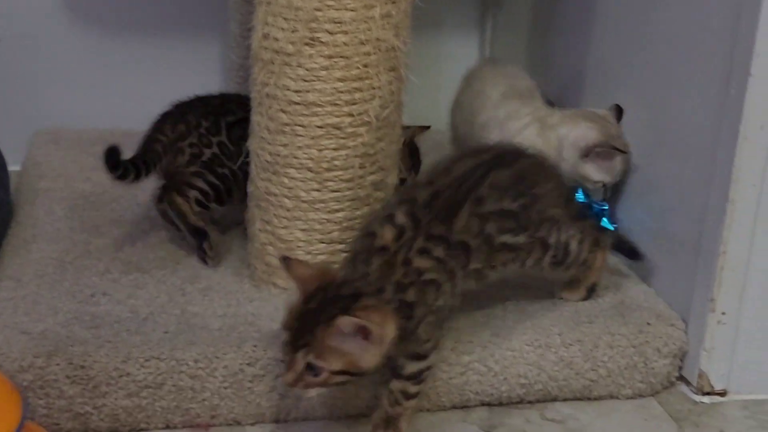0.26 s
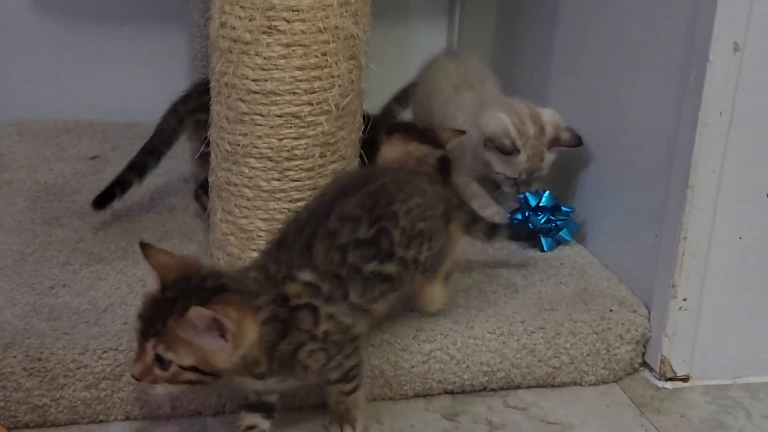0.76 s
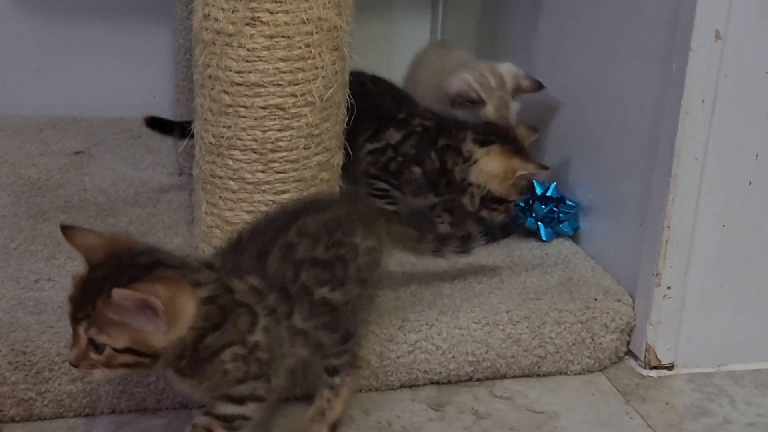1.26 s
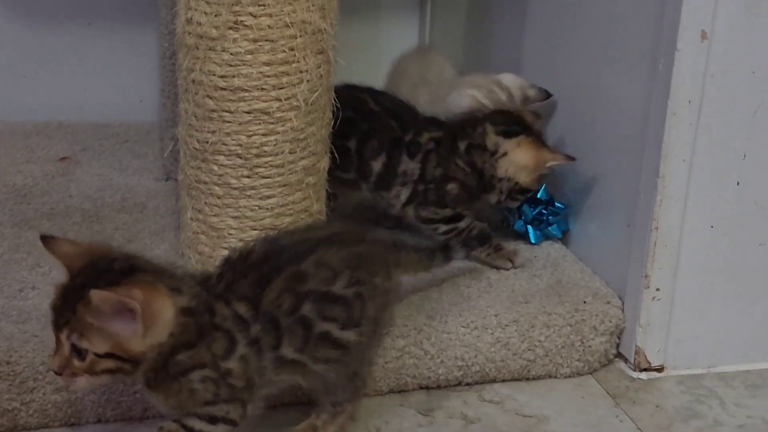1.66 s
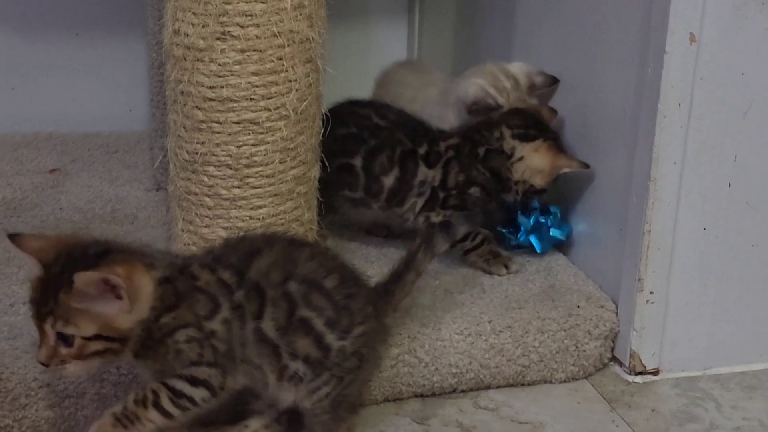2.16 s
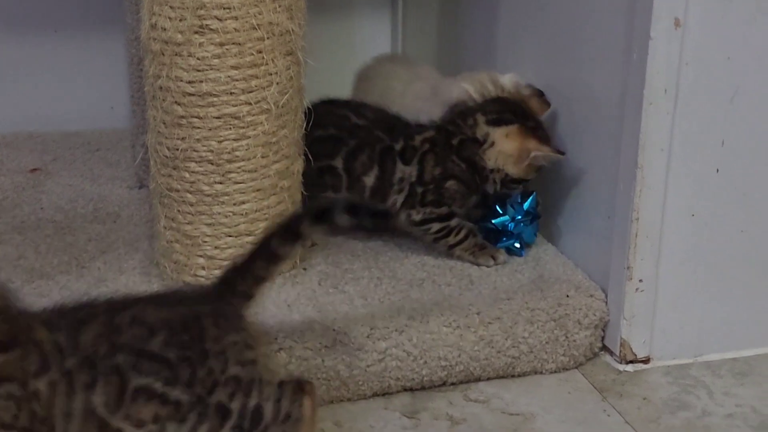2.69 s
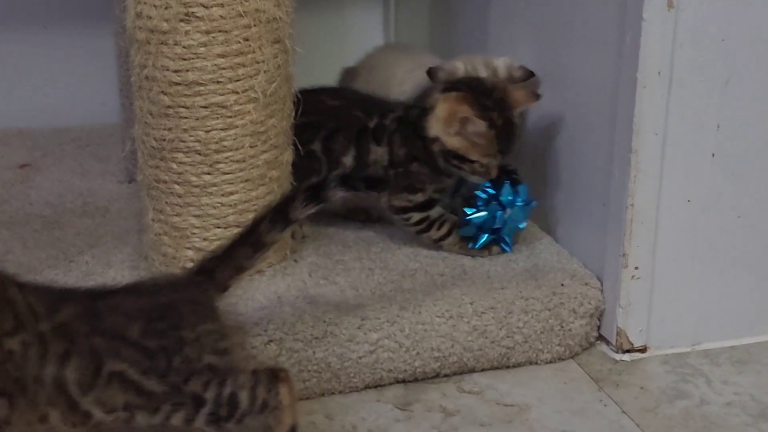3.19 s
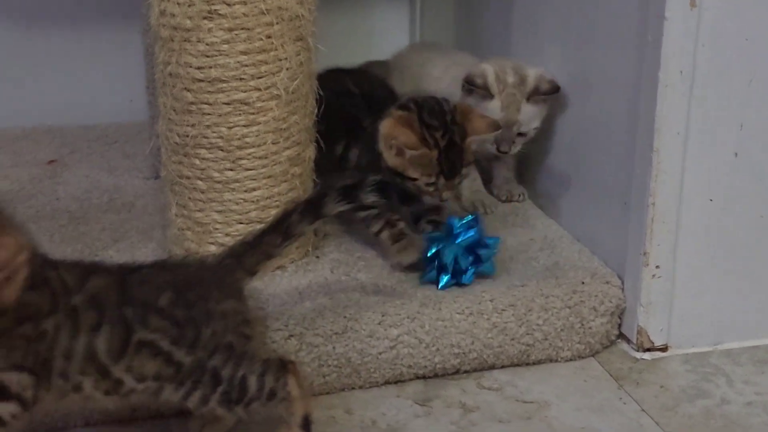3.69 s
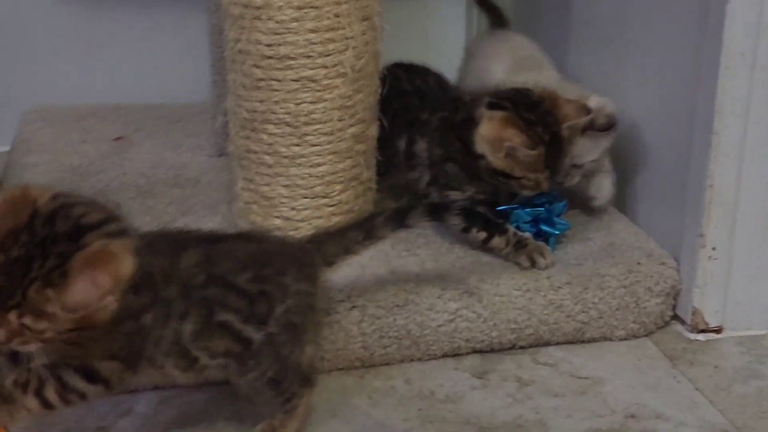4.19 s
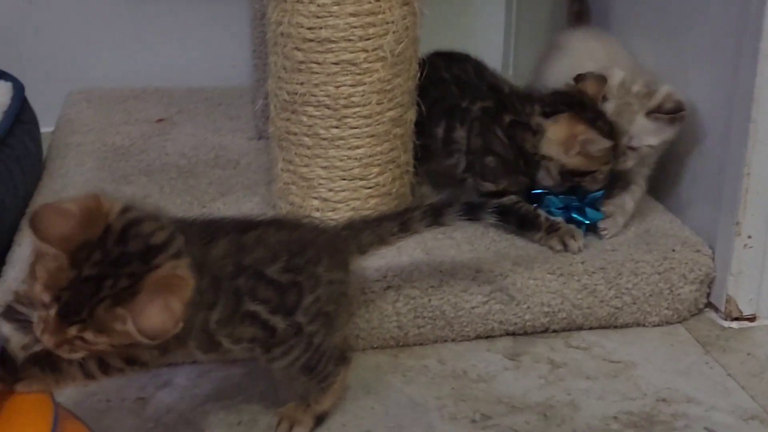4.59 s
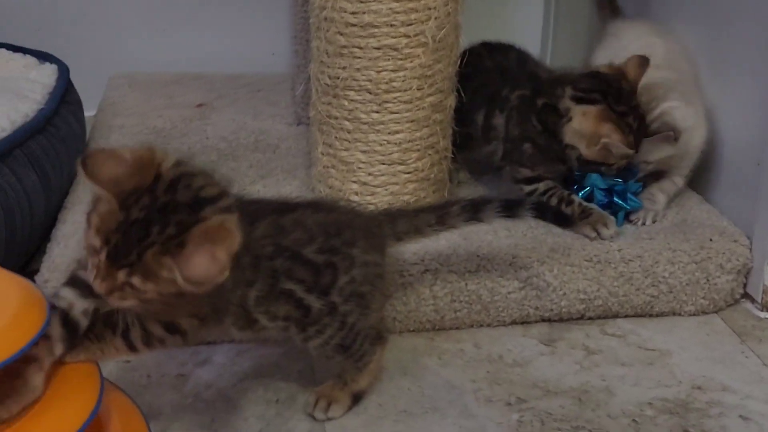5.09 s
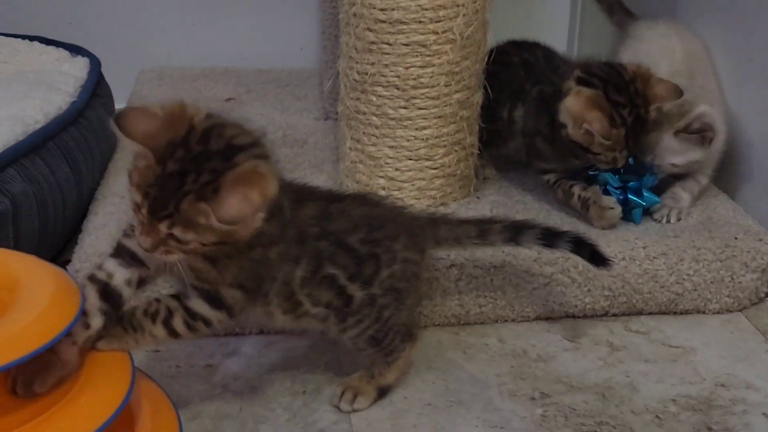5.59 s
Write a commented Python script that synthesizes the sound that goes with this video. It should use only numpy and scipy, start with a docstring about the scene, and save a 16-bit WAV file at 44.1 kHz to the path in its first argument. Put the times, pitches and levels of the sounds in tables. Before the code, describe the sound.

Throughout, a low, slowly beating hum from two motors, around 55 to 120 Hz, sits with room rumble and faint hiss in a small hard-floored room. From 0 to 0.9 s there is only faint fur brushing and tiny crinkles on a foil bow. At 0.94 s a small foil snap comes with a soft footfall; around 1.7 s a claw plucks carpet fibres in quick, dry rasps. Crinkles build from 2.1 s, with dull paw thuds. At 2.55 s hollow plastic knocks begin; the loudest foil snap cracks at 2.8 s. A hard knock at 3.0 s sets a ball rolling and rattling, with rim ticks and scrapes, slowing until about 4.2 s. Bright foil bursts come at 3.64, 3.73 and 3.82 s, another snap at 4.31 s. Weaker rolls follow at 4.26 and 4.97 s, then sparse soft knocks, fine crackles and brushing until nearly 6 s.

```python
"""Throughout, two motors hum through a small hard-floored room over low noise and faint hiss.
First, kittens' paws and bites crinkle a foil bow: swarms of clicks, one for each flipping crease.
A foil loop snaps at 0.94 s, and more snap from 2.6 s, as bursts that ring; at 1.7 s a claw plucks carpet
fibres in short rasps. From 2.6 s a nearer kitten bats a ball in a plastic track: struck resonances make the
knocks, and grains make the roll, which slows after each push, and the rubs on the rim. Soft footfalls, from
0.94 s on, are damped low swings."""
import sys
import numpy as np
from scipy import signal
from scipy.fft import rfft, irfft
from scipy.io import wavfile

SR = 44100
rng = np.random.default_rng(int(sys.argv[2]) if len(sys.argv) > 2 else 0)


def put_to_file(sound):
    """Save the sound as 16-bit audio at rate SR, in the file named by the first command-line argument."""
    columns = np.atleast_2d(sound).T  # one column per channel
    safe = np.clip(columns, -1, 1)
    whole_steps = np.round(safe * 32767)
    wavfile.write(sys.argv[1], SR, whole_steps.astype(np.int16))


N = 257984  # samples in the scene
TAPS = 2048  # samples in a short sound
EDGE_HZ = 16550  # upper band limit

# Levels of events are in dB before the trim_db of their function; colours are relative.
# Partials of the motors. Each row: frequency in Hz, rms level in dB before the waver.
HUM_PARTIALS = [(54.36, -69), (59.23, -60.5), (108.72, -57), (118.48, -61.5), (163.08, -73), (251.4, -80)]
# Colour of the low room noise. Each row: frequency in Hz, level in dB.
BOOM_COLOUR = [(20, -14.5), (40, 1.5), (58, -9.5), (90, 5), (115, 3), (140, -8), (200, -16.5), (245, -15.5),
               (290, -24), (400, -30), (700, -72.5)]
# Colour of the steady hiss. Each row: frequency in Hz, level in dB.
HISS_COLOUR = [(180, -31.5), (300, -8.5), (420, -8), (700, -8.5), (1000, -15), (1600, -17.5), (2800, -22),
               (4400, -21.5), (5500, -27.5), (7000, -27), (8300, -24.5), (9000, -28.5), (9600, -40.5),
               (16000, -35)]
# Likeness of the two sides in diffuse sound. Each row: frequency in Hz, correlation from -1 to 1.
SIDE_CORRELATION = [(25, -0.37), (60, 1), (130, 0.89), (290, 0.54), (600, 0.23), (1000, 0.1),
                    (1600, -0.083), (3000, 0.039), (15000, -0.13)]
# Decay of the room. Each row: frequency in Hz, t60 in seconds.
ROOM_DECAY = [(150, 0.51), (500, 0.31), (1500, 0.56), (4000, 0.4), (8000, 0.29), (15000, 0.23)]
# Paws land on the carpeted stand and the floor. Each row: start in seconds, level in dB, pitch in Hz.
FOOTFALLS = [(0.936, -43, 106.6), (2.224, -38.5, 81.3), (2.332, -39, 62.6), (2.565, -34.5, 83.3),
             (3.018, -38, 79), (3.867, -39, 81.4), (4.497, -38.5, 108.3)]
# Paws shuffle on the hollow carpeted stand. Each row: start in seconds, length in seconds, level in dB,
# resonance in Hz.
STAND_SHUFFLES = [(2.999, 0.052, -58, 365), (3.736, .12, -61.5, 256), (3.848, 0.096, -67, 208),
                  (4.033, .05, -73, 387), (4.305, .035, -63.5, 266), (4.506, 0.043, -66, 205),
                  (4.707, 0.039, -69.5, 334)]
# Carpet fibres let go of a claw. Each row: start in seconds, level in dB, pitch in Hz.
FIBRE_PLUCKS = [(1.659, -73, 4470), (1.666, -70, 2880), (1.675, -69, 2600), (1.694, -65, 5000),
                (1.702, -67, 2700), (1.709, -63, 3740), (1.713, -63.5, 5500), (1.722, -66.5, 3700),
                (1.733, -71, 4500), (1.74, -67.5, 3450)]
# Colour of a plucked fibre. Each row: frequency in Hz, level in dB.
FIBRE_COLOUR = [(500, -21), (1700, -12), (2065, 2), (2350, -8), (3600, 1.5), (5900, 1), (6500, -7),
                (7350, 4), (9000, -9), (10000, -22), (16000, -19)]
# Fur brushes the bow. Each row: start in seconds, length in seconds, level in dB at the crest.
FUR_STROKES = [(0.0, 0.92, -88), (3.28, 0.29, -88.5), (4.595, 0.11, -83), (4.676, 0.24, -82.5),
               (5.04, 0.36, -89.5), (5.358, 0.2, -83), (5.574, 0.5, -81)]
# A paw sets the ball rolling. Each row: start in seconds, time to a stop in seconds, level in dB at the start.
BALL_ROLLS = [(3.057, 1.18, -65.5), (4.262, 0.76, -79), (4.972, 1.5, -81)]
# Colour of the rolling rumble. Each row: frequency in Hz, level in dB.
RUMBLE_COLOUR = [(100, -7), (220, 4), (350, -10.5), (450, -10.5), (600, 5), (780, -7), (1000, -7.5),
                 (1500, -35)]
# Colour of the rattle and of contacts with the rim. Each row: frequency in Hz, level in dB.
RATTLE_COLOUR = [(600, -46), (950, 3.5), (1400, 7), (1900, 0), (2300, -11), (3000, -28), (6000, -31.5),
                 (12000, -60)]
# Spots of the track under the ball. Each row: frequency in Hz, level in dB, t60 in seconds.
ROLLED_SPOTS = [(480, -4, 0.033), (590, -5, 0.043), (770, -4, 0.05), (975, -7, 0.039), (1354, -11.5, 0.031),
                (1585, -7.5, 0.053), (1750, -8, 0.027)]
# The ball rubs along the rim. Each row: start in seconds, length in seconds, level in dB, rim resonance in Hz.
RIM_SCRAPES = [(2.562, 0.044, -55, 1820), (2.753, 0.053, -61, 1640), (3.006, 0.05, -49, 1240),
               (3.016, 0.038, -49, 2170), (3.192, 0.021, -61.5, 1870), (3.248, 0.097, -66, 1040),
               (3.404, 0.05, -64, 1600), (3.59, 0.041, -61.5, 1580), (3.678, .03, -60.5, 1340),
               (3.799, 0.097, -67, 1230), (3.905, 0.049, -72, 865), (3.944, 0.081, -63.5, 1440),
               (3.948, 0.078, -62, 855), (4.072, 0.09, -68, 1300), (4.112, 0.038, -71, 2060),
               (4.355, .06, -73, 703), (4.441, .035, -76, 870), (4.529, 0.039, -70.5, 950),
               (4.599, .09, -82, 960), (5.067, 0.1, -77, 596), (5.17, 0.047, -77, 566),
               (5.386, 0.048, -79.5, 1260)]
# The ball clips the rim. Each row: start in seconds, level in dB, rim resonance in Hz.
RIM_BUMPS = [(3.199, -50.5, 1520), (3.264, -49, 900), (3.399, -47, 1800), (3.413, -47, 1700),
             (3.437, -51, 1560), (3.493, -57, 1840), (3.603, -55, 1590), (3.688, -56, 1400),
             (3.875, -57, 958), (3.914, -52.5, 1100), (3.955, -56, 851), (4.072, -56, 1570),
             (4.124, -55, 1790)]
# The ball or a paw knocks the track. Each row: start in seconds, level in dB, hardness in dB (0 is bare
# plastic, -25 a soft paw), pitch of the struck spot in Hz, level of its tock in dB.
TRACK_KNOCKS = [(2.554, -55, 9, 560, -9), (2.572, -42, -12, 508, -13), (2.594, -47, -3.5, 543, -6),
                (2.755, -54.5, -3, 550, -19), (2.778, -60.5, -12, 520, -11), (2.833, -62, 1, 534, -3.5),
                (3.001, -37, 4, 530, -8), (3.005, -42.5, -5, 480, -11.5), (3.013, -44.5, -12, 452, -6),
                (3.022, -47, -4, 660, -29), (3.402, -59, -20, 610, -9.5), (3.598, -58, -18, 558, -10),
                (3.645, -60, -23, 570, -10), (3.689, -58, -16, 770, -14), (3.712, -60, -18, 770, -11),
                (3.736, -59, -18, 630, -14), (4.039, -59, -23.5, 535, -13), (4.08, -58.5, -20, 564, -8.5),
                (4.124, -61.5, -14, 556, -5), (4.18, -69.5, -27, 623, -5), (4.274, -61, -23.5, 622, -6),
                (4.499, -66.5, -21, 826, -10.5), (4.656, -68, -22, 633, -10), (4.716, -65, -19, 557, -7),
                (4.988, -71, -7, 800, -6.5), (5.388, -69, -11, 590, -10), (5.74, -59, -22, 560, -7)]
# Modes of the whole track. Each row: frequency in Hz, level in dB, t60 in seconds.
RING_MODES = [(268.8, -4.5, 0.35), (420, 9.5, 0.075), (478, 0.5, 0.16), (586, 10.5, 0.029),
              (710, -16.5, 0.027), (978, -7.5, 0.28), (1350, -18, 0.21), (1640, -20, 0.22),
              (1760, -14.5, 0.11), (2060, -14, 0.061), (2145, -7.5, 0.11)]
# Colour of a contact on the plastic. Each row: frequency in Hz, level in dB.
PLASTIC_COLOUR = [(60, -33.5), (220, -2), (330, -8.5), (500, 0.5), (700, 6.5), (1000, -0.5), (1400, 9.5),
                  (2000, 6), (2600, 1.5), (4500, -0.5), (8000, -20.5), (10000, -17), (12500, -9),
                  (16000, -19)]
# A paw or a bite crushes the bow. Each row: start in seconds, level in dB, loop pitch in Hz,
# swell time in seconds, body in dB, fizz in dB before loop size and force.
BOW_CRUSHES = [(0.115, -63, 7350, 0.0093, -4, -23), (0.479, -68, 7600, 0.0034, -1, -16),
               (0.644, -68.5, 7100, 0.0076, 4, -15), (0.929, -59.5, 7250, 0.014, -2, -17),
               (2.111, -63, 8250, 0.0052, -2, -20), (2.213, -56.5, 7800, 0.0029, 4, -19),
               (2.232, -50, 7400, 0.0056, -0.5, -20), (2.288, -52.5, 7400, 0.012, -5.5, -23),
               (2.395, -51, 7400, 0.012, -3, -18), (2.552, -45.5, 4900, 0.0055, 5, -16),
               (2.574, -42, 6600, 0.008, -0.5, -15), (2.659, -59.5, 7400, 0.021, -1, -11),
               (2.75, -57, 4570, 0.035, -1.5, -14), (2.965, -45, 5700, 0.0093, 0, -15),
               (2.986, -39.5, 5930, 0.0094, -3, -14), (3.133, -51.5, 6500, 0.0064, 4, -17.5),
               (3.563, -61.5, 7730, 0.0071, -1.5, -20), (3.676, -55.5, 6960, 0.063, -3.5, -15),
               (3.729, -42.5, 4600, 0.0072, 0.5, -18), (3.821, -46.5, 7500, 0.0029, -3.5, -18),
               (3.994, -58.5, 5600, 0.017, -0.5, -14), (4.334, -62.5, 6400, 0.024, 3.5, -15),
               (4.415, -64, 6200, 0.014, -3, -16.5), (4.999, -59.5, 4400, 0.0068, -2.5, -13),
               (5.588, -61.5, 9200, 0.0026, -2, -19.5), (5.632, -68.5, 7660, 0.0037, -5, -18),
               (5.735, -63.5, 4970, 0.012, -2, -14), (5.822, -73, 7400, .012, -3, -21)]
# A foil loop buckles at once. Each row: start in seconds, level in dB, loop pitch in Hz, body in dB,
# lowest ring of the bow in Hz, fizz in dB before loop size and force.
LOOP_SNAPS = [(0.9443, -44.5, 6600, -9, 503, -18), (2.59, -31.5, 5900, -1.5, 550, -16),
              (2.805, -21.5, 5880, -9, 1300, -21), (2.8074, -23.5, 6370, -5.5, 1410, -14.5),
              (2.8134, -33, 9050, -1, 1690, -12.5), (2.818, -39, 9000, 3, 1690, -18),
              (2.827, -46.5, 6000, 16, 1540, -20), (3.0001, -31.5, 5760, 6.5, 1510, -9.5),
              (3.0985, -38.5, 5750, -20, 1500, -18), (3.6431, -36, 6970, -5, 1390, -11.5),
              (3.7303, -27.5, 4330, -4.5, 740, -14), (3.7316, -35.5, 6700, -14, 1500, -22),
              (3.76, -42, 6900, -11, 1500, -24), (3.8209, -43, 7750, -2, 1500, -20),
              (3.8423, -48.5, 7100, -8, 1485, -15), (4.045, -57, 7400, -4, 2000, -8),
              (4.1135, -58, 8700, -7, 2000, -14), (4.3132, -37, 5830, -3, 1210, -26),
              (4.3722, -57, 2800, 2.5, 1930, -18), (4.9929, -47.5, 4540, -9, 845, -12),
              (5.7049, -61, 4940, 6, 1800, -22), (5.7359, -64, 7260, 5, 1300, -23),
              (5.7471, -58, 4800, 0, 1400, -20), (5.8394, -60, 5450, -6.5, 1980, -18)]
# Colour of the foil. Each row: frequency in Hz, level in dB.
FOIL_COLOUR = [(100, -34), (500, 3.5), (1100, -4.5), (1700, -4), (2400, -4.5), (4000, -0.5), (5600, -4),
               (6600, -6.5), (8600, 0), (10200, 3.5), (12500, 11), (16000, 0.5)]
# Colour of a buckling loop, on top of the foil's. Each row: frequency in Hz, level in dB.
BUCKLE_COLOUR = [(1400, -2), (2600, 0), (4000, -2.5), (5000, 3), (5800, 0), (7200, 1), (9000, -4),
                 (12500, -2)]


def gain_of(db):
    """Decibels to gain."""
    return 10 ** (np.asarray(db) / 20)


def unit(x):
    """Scales to an energy of one."""
    return x / np.sqrt(np.sum(x ** 2) + 1e-20)


def evened(x):
    """Scales to an rms of one."""
    return x / np.sqrt(np.mean(x ** 2) + 1e-20)


def read(points, hz):
    """Reads a table on a logarithmic frequency axis."""
    f, value = np.transpose(points)
    return np.interp(np.log(hz + 1), np.log(f + 1), value)


def add(mix, start_s, sound):
    """Mixes a sound in at start_s."""
    part = mix[max(round(start_s * SR), 0):][:len(sound)]
    part += sound[:len(part)]


def through(x, response):
    """Convolves and keeps the length."""
    return signal.fftconvolve(x, response)[:len(x)]


def filtered(x, edge_hz, kind):
    """Second-order Butterworth filter."""
    return signal.lfilter(*signal.butter(2, edge_hz, kind, fs=SR), x)


def colour(*spectra):
    """The minimum-phase click whose spectrum is the sum of the given dB tables."""
    hz = abs(np.fft.fftfreq(TAPS, 1 / SR))
    log_gain = np.log(gain_of(sum(read(points, hz) for points in spectra)))
    spectrum = np.exp(np.conj(signal.hilbert(log_gain)))
    return np.fft.ifft(spectrum).real[:TAPS // 2]


def grains(size, per_s, spread_db):
    """Clicks at random moments, of random sign and exponentially spread dB heights, at an rms of one."""
    chance, sign, big = rng.random((3, size))
    height = gain_of(spread_db * np.minimum(-np.log(1 - big), np.pi))
    return evened((chance < per_s / SR) * np.sign(sign - .5) * height)


def arch(size):
    """Root of a half sine: swells and fades."""
    return np.sqrt(np.sin(np.pi * np.arange(size) / size))


def drift(count):
    """Straight lines between count random points over the whole scene."""
    return np.interp(np.arange(N), np.linspace(0, N, count), rng.standard_normal(count))


def ping(hz, t60_s):
    """One dying resonance of unit energy."""
    t = np.arange(SR // 4) / SR
    return unit(np.sin(2 * np.pi * hz * t) * gain_of(-60 * t / t60_s))


def diffuse(pair):
    """Sound from all around: the sides share each band as far as their correlation says."""
    a, b = rfft(pair)
    same = read(SIDE_CORRELATION, np.fft.rfftfreq(pair.shape[1], 1 / SR))
    return irfft(np.array([a, same * a + np.sqrt(1 - same ** 2) * b]), pair.shape[1])


def room(x, wet_db, side_db, lag_s, near, near_s):
    """Direct sound is louder and earlier on the left; dense echoes start strongly and die band by band."""
    size = SR * 3 // 4
    echoes = diffuse(np.array([grains(size, per_s=5000, spread_db=-2.5) for side in range(2)]))
    hz, t, bands = signal.stft(echoes, SR, nperseg=256)
    decay = gain_of(-60 * t / read(ROOM_DECAY, hz)[:, None])
    tails = signal.istft(bands * decay, SR, nperseg=256)[1]
    age_s = np.arange(tails.shape[1]) / SR
    onset = 1 - np.exp(-age_s / 0.00046)
    near_walls = 1 + near * np.exp(-age_s / near_s)
    left, right = (gain_of(wet_db) * unit(tail) for tail in tails * onset * near_walls)
    left[0] += gain_of(side_db)
    right[round(lag_s * SR)] += gain_of(-side_db)
    return np.array([through(x, left), through(x, right)])


def air(spectrum, db):
    """Steady room noise: diffuse white noise shaped by a colour."""
    noise = rfft(diffuse(rng.standard_normal((2, N))))
    shape = gain_of(read(spectrum, np.fft.rfftfreq(N, 1 / SR)))
    return gain_of(db) * evened(irfft(noise * shape, N))


def hum(waver=0.46, wander_rad=0.13):
    """Two motors at slightly different speeds beat; each partial wavers in level and phase."""
    t = np.arange(N) / SR
    out = np.zeros(N)
    for hz, rms_db in HUM_PARTIALS:
        phase = 2 * np.pi * (hz * t + rng.random()) + wander_rad * drift(count=24)
        level = np.sqrt(2) * gain_of(rms_db) * (1 + waver * drift(count=24))
        out += level * np.sin(phase)
    return out


def thumps(trim_db=-3, swell_s=0.011):
    """Each footfall is a few damped low swings."""
    out, t = np.zeros(N), np.arange(SR // 4) / SR
    u = t / swell_s
    for s, db, hz in FOOTFALLS:
        add(out, s, gain_of(db + trim_db) * u * np.exp(1 - u) * np.sin(2 * np.pi * hz * t))
    return out


def shuffles(trim_db=-2, ring_t60_s=0.028):
    """Paws drag through the pile and the board beneath answers with a dull murmur."""
    out = np.zeros(N)
    for s, length_s, db, hz in STAND_SHUFFLES:
        size = round(length_s * SR)
        drag = np.pad(grains(size, per_s=810, spread_db=3.5) * arch(size), (0, TAPS))
        board = through(through(drag, ping(hz, ring_t60_s)), ping(hz, ring_t60_s / 4))
        add(out, s, gain_of(db + trim_db) * np.sqrt(size) * unit(board))
    return out


def plucks(trim_db=22, tear_s=0.0041, peak_db=7):
    """Each fibre tears free of the claw in a short rasp."""
    out, t = np.zeros(N), np.arange(TAPS) / SR
    for s, db, hz in FIBRE_PLUCKS:
        rasp = grains(TAPS, per_s=3700, spread_db=-1.5) * np.exp(-t / tear_s)
        click = colour(FIBRE_COLOUR, [(hz / 1.7, 0), (hz, peak_db), (hz * 1.3, 0)])
        add(out, s, gain_of(db + trim_db) * unit(through(rasp, click)))
    return out


def rolling(spots_db=-1, wobble_db=2.5, rattle_db=-2.5, rumble_power=0.59, rattle_power=0.79):
    """The ball runs over tiny bumps, excites spots of the track at random and slows evenly after each push."""
    rumble, rattle, out = np.zeros((3, N))
    for s, length_s, db in BALL_ROLLS:
        speed = np.linspace(1, 0, round(length_s * SR), endpoint=False)
        add(rumble, s, gain_of(db) * speed ** rumble_power)
        add(rattle, s, gain_of(db + rattle_db) * speed ** rattle_power)
    pressure = gain_of(wobble_db * drift(count=220))
    for spectrum, level in (RUMBLE_COLOUR, rumble), (RATTLE_COLOUR, rattle):
        surface = grains(N, per_s=190, spread_db=8.0) * pressure
        out += evened(through(surface, colour(spectrum))) * level
    spots = np.zeros(N)
    for hz, db, t60_s in ROLLED_SPOTS:
        presence = gain_of(7.0 * np.tanh(drift(count=70)))  # each spot comes and goes on its own
        taps = grains(N, per_s=90, spread_db=3.0) * presence
        spots += gain_of(db) * through(taps, ping(hz, t60_s))
    return out + gain_of(spots_db) * evened(spots) * rumble


def scrapes(trim_db=-3, ring_t60_s=0.021):
    """The ball sticks and slips on the rim: scratchy grains swell and fade, each rub with its resonance."""
    out = np.zeros(N)
    for s, length_s, db, hz in RIM_SCRAPES:
        size = round(length_s * SR)
        slips = np.pad(grains(size, per_s=450, spread_db=-0.5) * arch(size), (0, TAPS))
        scratch = unit(through(slips, colour(RATTLE_COLOUR)))
        ring = unit(through(slips, ping(hz, ring_t60_s)))
        add(out, s, gain_of(db + trim_db) * np.sqrt(size) * unit(scratch + ring))
    return out


def bumps(trim_db=17, ring_t60_s=0.02, skid_s=0.0018, top_hz=3000):
    """Each touch is a short skid that rings the rim at that place."""
    out, t = np.zeros(N), np.arange(TAPS) / SR
    for s, db, hz in RIM_BUMPS:
        skid = grains(TAPS, per_s=4000, spread_db=2.5) * np.exp(-t / skid_s)
        tick = unit(through(skid, colour(RATTLE_COLOUR))) + ping(hz, ring_t60_s)[:TAPS]
        add(out, s, gain_of(db + trim_db) * unit(tick))
    return filtered(out, top_hz, "low")


def track_ring():
    """The decaying modes of the plastic track after one tap."""
    t = np.arange(SR // 3) / SR
    return unit(sum(gain_of(db - 60 * t / t60_s) * np.sin(2 * np.pi * hz * t) for hz, db, t60_s in RING_MODES))


def knocks(trim_db=31, ring_db=-12, damping_db=-8, softest_db=-32, clack_per_hardness=0.51,
           tock_s=0.0064, chatter_s=0.0028, press_s=0.0021, split_hz=1800):
    """A push and gritty chatter set spot and track ringing; a soft pad presses in gradually and damps the ring."""
    out, ring = np.zeros(N), track_ring()
    t = np.arange(len(ring)) / SR
    for s, db, hard_db, hz, tock_db in TRACK_KNOCKS:
        soft = np.clip(hard_db / softest_db, 0, 1)
        rise = 1 - soft * np.exp(-t / press_s)
        pad = unit(rng.choice([-1, 1], len(t)) * t * np.exp(-t / press_s))
        push = np.sqrt(1 - soft ** 2) * (t == 0) + soft * pad
        chatter = unit(grains(len(t), per_s=4000, spread_db=6) * np.exp(-t / chatter_s))
        contact = filtered(push, split_hz, "low") + filtered(chatter, split_hz, "high")
        tock = unit(np.sin(2 * np.pi * hz * t + np.pi / 3) * rise * np.exp(-t / tock_s))
        blow = contact + gain_of(tock_db) * tock + gain_of(ring_db + damping_db * soft) * ring
        clack_db = clack_per_hardness * hard_db
        hardness = [(800, 0), (1300, clack_db), (2100, clack_db), (3400, hard_db)]  # soft knocks are dull
        add(out, s, gain_of(db + trim_db) * through(blow, colour(PLASTIC_COLOUR, hardness)))
    return out


def foil_click(body_db, fizz_db, hz, peak_db=6, spread=1.55):
    """One crease flipping: large facets give body, small ones fizz, and the loop adds a broad peak."""
    loop = [(hz / spread, 0), (hz, peak_db), (hz * spread, 0)]
    facets = [(3600, body_db), (5600, 0.0098), (8600, 0.0023), (10200, fizz_db)]
    return colour(FOIL_COLOUR, facets, loop)


def loop_click(db, hz, body_db, fizz_db, middle_hz=6000, firm_db=-48.5, fizz_db_per_octave=11, fizz_per_force=0.26):
    """The click of one loop: the smaller the loop and the harder it is pressed, the more fizz."""
    size_db = fizz_db_per_octave * np.log2(hz / middle_hz)
    force_db = fizz_per_force * (db - firm_db)
    return foil_click(body_db, fizz_db + size_db + force_db, hz, peak_db=5.5)


def brushing():
    """Faint, fine crackle of fur sliding over the foil; each stroke swells and fades."""
    click = foil_click(body_db=-1.5, fizz_db=-20.0, hz=7400)
    crackle = through(grains(N, per_s=3200, spread_db=7), click)
    pressure = np.zeros(N)
    for s, length_s, db in FUR_STROKES:
        add(pressure, s, gain_of(db) * arch(round(length_s * SR)))
    return evened(crackle) * pressure


def crinkles(trim_db=-4.0, spread_db=5, per_s=1100):
    """Each crush is a swarm of flipping creases that creeps in, peaks and dies away."""
    lead = SR // 10  # samples before the start
    out, t = np.zeros(N), np.arange(-lead, lead) / SR
    for s, db, hz, swell_s, body_db, fizz_db in BOW_CRUSHES:
        pressure = 1 / np.cosh(t / swell_s - 1)
        swarm = grains(len(t), per_s, spread_db) * pressure
        click = loop_click(db, hz, body_db, fizz_db)
        add(out, s + t[0], gain_of(db + trim_db) * through(swarm, click))
    return out


def snaps(trim_db=17, shiver_s=0.0011, ring_db=-15, ring_t60_s=0.0061, below_db=-17, edge_db=5):
    """A loop pops over, rings and shivers for milliseconds; the bow gives little below its lowest ring."""
    out, t = np.zeros(N), np.arange(TAPS) / SR
    for s, db, hz, body_db, low_hz, fizz_db in LOOP_SNAPS:
        shiver = unit(rng.choice([-1, 1], TAPS) * np.exp(-t / shiver_s))
        pop = shiver + gain_of(ring_db) * ping(hz, ring_t60_s)[:TAPS]
        click = loop_click(db, hz, body_db, fizz_db)
        bow = colour(BUCKLE_COLOUR, [(low_hz / 1.2, below_db), (low_hz, edge_db), (low_hz * 2, 0)])
        add(out, s, gain_of(db + trim_db) * through(through(pop, click), bow))
    return out


def scene():
    """Hum, noise and footfalls, then claw, toy and bow, each with its own place in the room."""
    house = hum() + thumps() + air(BOOM_COLOUR, db=-54.0)
    house = house * gain_of([[-.4], [.4]])  # left, right
    hiss = air(HISS_COLOUR, db=-74.5)
    claw = room(plucks(), wet_db=2.0, side_db=2.5, lag_s=0.00021, near=1.0, near_s=0.026)
    track = shuffles() + rolling() + scrapes() + bumps() + knocks()
    toy = room(track, wet_db=0, side_db=1.0, lag_s=0.00035, near=0.7, near_s=0.034)
    bow = room(brushing() + crinkles(), wet_db=5.5, side_db=3.5, lag_s=0.00014, near=0.91, near_s=0.019)
    pops = room(snaps(), wet_db=2, side_db=4.5, lag_s=0.0003, near=1.7, near_s=0.015)
    return house + hiss + claw + toy + bow + pops


def record(dry):
    """Limits the band with a steep linear-phase low-pass."""
    low_pass = signal.firwin(511, EDGE_HZ, window=("kaiser", 9), fs=SR)
    return signal.oaconvolve(dry, low_pass[None], "same")


dry = scene()
out = record(dry)
put_to_file(out)
```